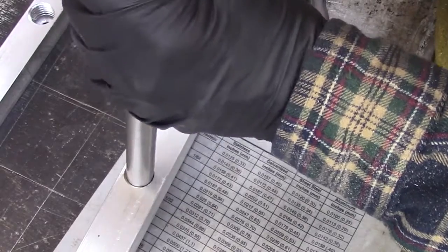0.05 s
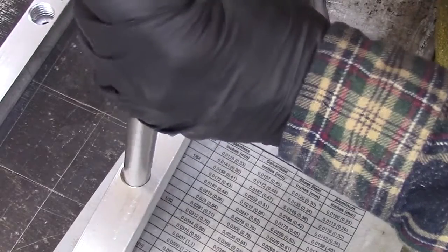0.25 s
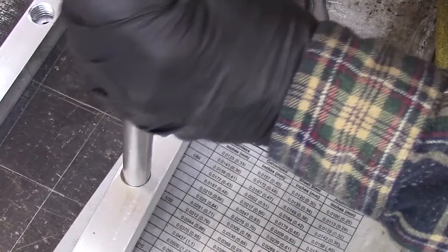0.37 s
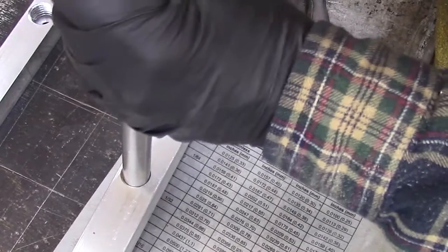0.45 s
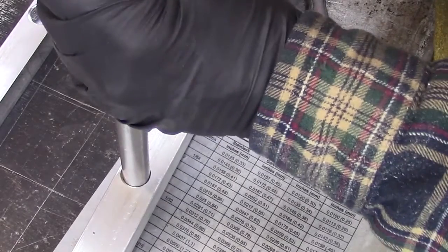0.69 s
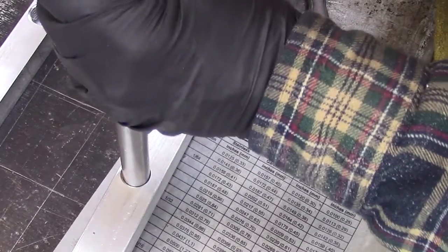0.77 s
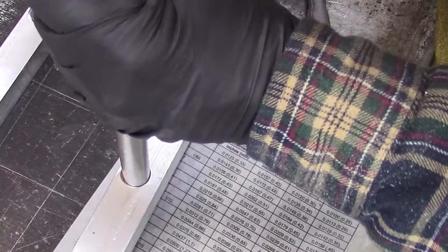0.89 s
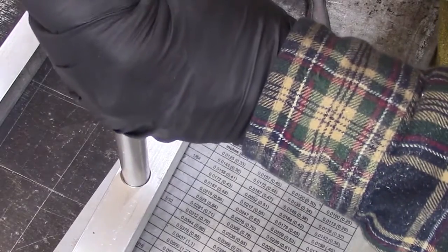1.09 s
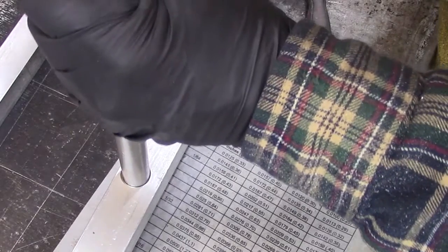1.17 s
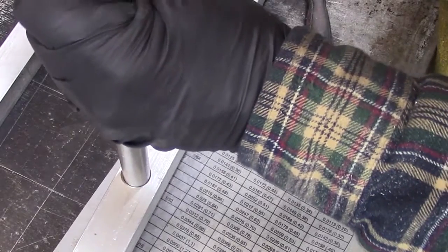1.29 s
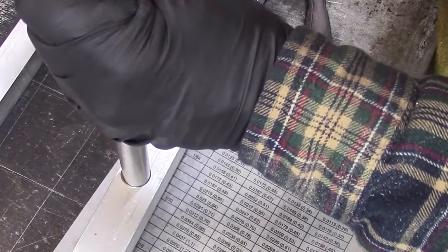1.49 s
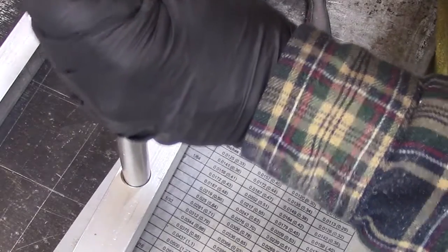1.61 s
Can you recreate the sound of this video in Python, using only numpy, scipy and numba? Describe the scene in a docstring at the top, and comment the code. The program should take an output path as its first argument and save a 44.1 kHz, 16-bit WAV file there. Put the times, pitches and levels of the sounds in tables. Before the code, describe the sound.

A hammer strikes a steel tube standing on a metal bar: three hard, ringing blows, each echoing off hard workshop walls, over a faint low hum, heard very close with the loudness squeezed.

```python
"""Hammer taps on a steel tube

A hammer taps a steel tube that drives a bearing into a metal bar on a bench, close to a camera.
Contact is coloured noise; hammer, tube, bar, plate and bench are banks of damped, wavering sines.
The hard shop walls answer with a dense noise tail of about half a second, over a steady shop hum.
The camera's limiter squeezes each blow, so that the echo swells back before it dies into the hum."""
import sys
import numpy as np
from scipy import signal
from scipy.fft import rfft, irfft, next_fast_len
from scipy.io import wavfile
from scipy.ndimage import minimum_filter1d
from numba import njit

SR = 44100
rng = np.random.default_rng(int(sys.argv[2]) if len(sys.argv) > 2 else 0)


def gain_from_db(level_db):
    """Turn a decibel level (scalar or array-like) into a linear amplitude factor."""
    decades = np.asarray(level_db, float) / 20
    return 10 ** decades


def store_pcm(level_fs):
    """Save levels as 16-bit WAV."""
    pcm = np.round(np.clip(level_fs, -1, 1) * 32767).astype(np.int16)
    wavfile.write(sys.argv[1], SR, np.atleast_2d(pcm).T)


N = 72765

# Hammer blows: t/s, level/dB, hardness/(dB/octave), crack level before CRACK_DB/dB
BLOWS = [(-.24, 2.3, 1.8, -0.7), (0.2111, -0.5, 0.36, 6.8), (0.8361, -6.04, -1, -24),
         (1.2183, -4.8, -.3, 1.6)]
# Drive of each body, row per blow: tube/dB, hammer/dB, bar/dB, plate/dB, bench top/dB, shelf/dB, legs/dB
BODY_DRIVE_DB = [(-0.5, .3, -4.5, -1, 8.6, 4.5, -15), (2, -0.5, 2.6, 3.5, 6.5, -1, -4.9),
                 (-3.5, 2.5, -7, 4, 9.5, -7.5, -2), (-3.5, -1, -3.5, 6, -13, -37, -6)]
# Crack sent to the walls, entry per blow: level/dB
CRACK_TO_WALLS_DB = [0.5, 0.2, 2, 0.4]
# Light hammer rebounds: t/s, level/dB
REBOUNDS = [(.2285, 10.5), (0.8437, -12.5), (0.8495, -3.5)]

# Mode pitches of each body: f/Hz (bench: one list each for top, shelf, legs)
TUBE_HZ = [3101, 3833, 4603, 6377, 9297, 10290, 10830, 11500, 12640, 15040]
HAMMER_HZ = [3144, 3150, 5400, 7273, 8376]
BAR_HZ = [463, 641, 698, 1145, 1394, 1502, 2250]
PLATE_HZ = [551, 662, 759, 828, 991, 1235]
BENCH_HZ = [
    [259],
    [295, 350],
    [183],
]
# Modes in the same order: level before drive and scatter/dB, t60/s
TUBE_MODES = [(-6.5, 0.39), (-7, 0.47), (-9, 0.35), (-17.5, 0.52), (-10, 0.24), (-22.5, 0.48), (-28, 0.15),
              (-7, 0.26), (-15.5, 0.26), (-25, .2)]
HAMMER_MODES = [(-9, 0.18), (4.5, 0.051), (-18, 0.5), (-8.5, 0.083), (-4.5, 0.12)]
BAR_MODES = [(-29.5, 0.55), (-10.5, 0.49), (-15, 0.43), (-12, .4), (-23.5, 0.58), (-13.5, 0.47),
             (-22, 0.32)]
PLATE_MODES = [(-14, 0.23), (-18, 0.42), (-8, 0.19), (-12.5, 0.23), (-33, 0.1), (-24, 0.51)]
BENCH_MODES = [
    [(-11.5, 0.26)],
    [(-3, 0.16), (-11.5, 0.25)],
    [(-19, 0.55)],
]

# Contact colour before the hardness tilt: f/Hz, level/dB
CONTACT_COLOUR = [(60, -35.5), (200, -18), (600, -6.5), (1300, -1), (3000, 0.28), (4500, -4), (7000, -10),
                  (10200, -14.5), (12000, -7.5), (14500, -22.5), (16500, -10.5)]
# Initial colour of the wall echo: f/Hz, level/dB
WALL_COLOUR = [(100, 24.5), (400, 18.5), (800, 8), (1500, 4), (4000, -1.55), (8000, 4), (10200, -4.5),
               (12000, -18.5), (14000, -17.5), (16000, -23)]
# Decay of the wall echo: f/Hz, t60/s
WALL_T60 = [(150, 0.4), (500, 0.37), (2000, 0.56), (5000, 0.61), (10000, 0.41), (16000, 0.79)]
# Gain of the left-right difference, echo and hum: f/Hz, level/dB
SIDE_GAIN = [(30, -18), (70, -17), (150, -56), (500, -27.5), (2000, -22), (4500, -15.5), (9000, -16),
             (12000, -13), (15000, -20)]
# Hum colour: f/Hz, relative level/dB
HUM_COLOUR = [(18, -71), (30, -8), (227, 7), (328, -3.5), (461, -6), (684, -9), (1280, -11.5), (1670, -23),
              (6900, -27.5), (16000, -42)]

CRACK_DB, CRACK_T60_S = 4, 0.01
RATTLE_DB, RATTLE_T60_S = 2, 0.053
REBOUND_T60_S, REBOUND_HARDNESS_DB_PER_OCT = 0.025, 1.2
TUBE_RISE_S, BAR_RISE_S, BENCH_RISE_S = 0.00086, 0.011, 0.021  # tube's also hammer, bar's also plate
SCATTER_DB = 0.5  # standard deviation of each mode's level, blow to blow
LINEWIDTH_RATIO = 0.003  # mode linewidth / pitch, from phase wander
RING_OCT_PER_HARDNESS = 1  # shift of the tube and hammer lowpass

WALL_DB, WALL_BUILD_S, FIRST_WALL_S = 2.5, 0.014, 0.004
WALL_HIGH_RING_DB, WALL_LOW_RING_DB = -5.5, -8  # tube and hammer; bar, plate and bench
HUM_DB, HUM_SIDE_DB = -38.5, 7.5  # side: extra, ahead of SIDE_GAIN

LIMIT_DB, RATIO = -4.5, 20
ATTACK_S, RELEASE_DB_PER_S = 0.012, 183
CLIP_TOP, CLIP_HARD = 0.9, 10  # full-scale fraction, knee exponent
LOW_CUT_HZ, TOP_HZ = 158, 15400


def along(points, hz):
    """Interpolates (f/Hz, value) points on a log-frequency axis."""
    f, v = np.transpose(points)
    return np.interp(np.log(hz + 1), np.log(f + 1), v)


def coloured(x, db_of):
    """Filters x with zero phase; db_of gives gain in dB at f/Hz."""
    size = next_fast_len(x.shape[-1] + 4096)
    gain = gain_from_db(db_of(np.fft.rfftfreq(size, 1 / SR)))
    return irfft(rfft(x, size) * gain, size)[..., :x.shape[-1]]


def unit(x):
    """Scales x to rms 1."""
    return x / np.sqrt(np.mean(x ** 2))


def contact(hardness, x):
    """Steel-on-steel contact: x coloured, brighter for harder contact, rms 1."""
    def colour_db(hz):
        tilt_db = hardness * np.log2((hz + 1) / 3000)
        return along(CONTACT_COLOUR, hz) + tilt_db
    return unit(coloured(x, colour_db))


def ring(pitches_hz, modes, t, rise_s, drive_db):
    """Struck body: a sum of exponentially damped sines with random-walk phase and a soft onset."""
    hz = np.array(pitches_hz)[:, None]
    level_db, t60_s = np.transpose(modes)[:, :, None]
    level_db = level_db + drive_db + SCATTER_DB * rng.standard_normal(hz.shape)
    steps = rng.standard_normal((len(hz), len(t)))
    drift = np.cumsum(steps, axis=1) * np.sqrt(2 * np.pi * LINEWIDTH_RATIO * hz / SR)
    phase = 2 * np.pi * (hz * t + rng.random(hz.shape)) + drift
    total = (gain_from_db(level_db - 60 * t / t60_s) * np.sin(phase)).sum(0)
    return total * (1 - np.exp(-t / rise_s))


def spread(mid_side):
    """Left and right from a middle and a coloured difference."""
    mid = mid_side[0]
    side = coloured(mid_side[1], lambda hz: along(SIDE_GAIN, hz))
    return np.array([mid + side, mid - side])


def walls(x):
    """Wall echo: x convolved with fresh noise that builds up, then decays at its own rate per frequency."""
    hz, t, z = signal.stft(rng.standard_normal((2, SR)), SR, nperseg=256)
    start_db = along(WALL_COLOUR, hz)[:, None]
    t60_s = along(WALL_T60, hz)[:, None]
    tail = signal.istft(z * gain_from_db(start_db - 60 * t / t60_s), SR, nperseg=256)[1][:, :SR]
    tail = tail * (1 - np.exp(-np.arange(SR) / SR / WALL_BUILD_S))
    tail = tail / np.linalg.norm(tail[0])
    return spread(signal.fftconvolve(x[None], tail, axes=1)[:, :len(x)])


def blow(db, hardness, crack_db, drive_db, echo_db):
    """One tap: contact crack and rattle, the bodies it sets ringing, and the walls' answer."""
    t = np.arange(SR) / SR
    crack_env = gain_from_db(crack_db + CRACK_DB - 60 * t / CRACK_T60_S)
    rattle_env = gain_from_db(RATTLE_DB - 60 * t / RATTLE_T60_S)
    crack = contact(hardness, rng.standard_normal(SR)) * (crack_env + rattle_env)

    high = ring(TUBE_HZ, TUBE_MODES, t, TUBE_RISE_S, drive_db[0])
    high = high + ring(HAMMER_HZ, HAMMER_MODES, t, TUBE_RISE_S, drive_db[1])
    cutoff_hz = np.clip(9000 * 2 ** (RING_OCT_PER_HARDNESS * hardness), 2000, 20000)
    high = signal.sosfilt(signal.butter(1, cutoff_hz, fs=SR, output="sos"), high)

    low = ring(BAR_HZ, BAR_MODES, t, BAR_RISE_S, drive_db[2])
    low = low + ring(PLATE_HZ, PLATE_MODES, t, BAR_RISE_S, drive_db[3])
    for hz, modes, part_db in zip(BENCH_HZ, BENCH_MODES, drive_db[4:]):
        low = low + ring(hz, modes, t, BENCH_RISE_S, part_db)

    # the crack reaches the walls as one delayed pulse at the crack's rms
    pulse = 1.0 * (np.arange(SR) == round(FIRST_WALL_S * SR))
    kick = contact(hardness, pulse) * np.sqrt(np.mean(crack ** 2))
    to_walls = gain_from_db(echo_db) * kick + gain_from_db(WALL_HIGH_RING_DB) * high + gain_from_db(WALL_LOW_RING_DB) * low
    return gain_from_db(db) * (crack + high + low + gain_from_db(WALL_DB) * walls(to_walls))


def hum():
    """Steady shop hum: stationary coloured noise, middle and difference independent."""
    pair = unit(coloured(rng.standard_normal((2, N)), lambda hz: along(HUM_COLOUR, hz)))
    return gain_from_db(HUM_DB) * spread(pair * gain_from_db([[0], [HUM_SIDE_DB]]))


def rebound(db):
    """Light hammer rebound: a short decaying burst of contact noise, no ring or echo."""
    t = np.arange(SR) / SR
    return contact(REBOUND_HARDNESS_DB_PER_OCT, rng.standard_normal(SR)) * gain_from_db(db - 60 * t / REBOUND_T60_S)


def scene():
    """All taps, the first already fading, and their rebounds over the hum."""
    out = np.zeros((2, N + 2 * SR))  # 1 s of margin at each end
    for (t_s, *how), drive_db, echo_db in zip(BLOWS, BODY_DRIVE_DB, CRACK_TO_WALLS_DB):
        start = SR + round(t_s * SR)
        out[:, start:start + SR] += blow(*how, drive_db, echo_db)
    for t_s, db in REBOUNDS:
        start = SR + round(t_s * SR)
        out[:, start:start + SR] += rebound(db)
    return out[:, SR:SR + N] + hum()


@njit
def follow(over_db, attack, release_db):
    """Gain cut in dB: rises exponentially toward the excess, falls at a steady rate."""
    cut, now = np.zeros(len(over_db)), 0.0
    for i in range(len(over_db)):
        if over_db[i] > now:
            now = now + attack * (over_db[i] - now)
        else:
            now = max(now - release_db, 0.0)
        cut[i] = now
    return cut


def limiter(x):
    """Camera limiter: one gain for both channels, driven by the 2 ms peak of the louder."""
    peak = -minimum_filter1d(-np.abs(x).max(0), size=88, origin=43)
    over_db = (20 * np.log10(peak + 1e-9) - LIMIT_DB) * (1 - 1 / RATIO)
    return x * gain_from_db(-follow(over_db, 1 / (ATTACK_S * SR), RELEASE_DB_PER_S / SR))


def roll_off(x):
    """The treble ends steeply here."""
    return signal.sosfilt(signal.butter(12, 16310, fs=SR, output="sos"), x)


def record(dry):
    """Limiter, soft clipping, then band limits."""
    x = limiter(dry)
    x = x / (1 + np.abs(x / CLIP_TOP) ** CLIP_HARD) ** (1 / CLIP_HARD)
    x = signal.sosfilt(signal.butter(2, LOW_CUT_HZ, "high", fs=SR, output="sos"), x)
    x = signal.sosfilt(signal.butter(8, TOP_HZ, fs=SR, output="sos"), x)
    return roll_off(x)


dry = scene()
out = record(dry)
store_pcm(out)
```